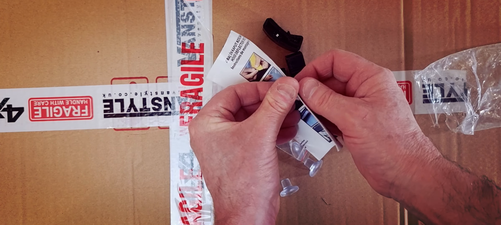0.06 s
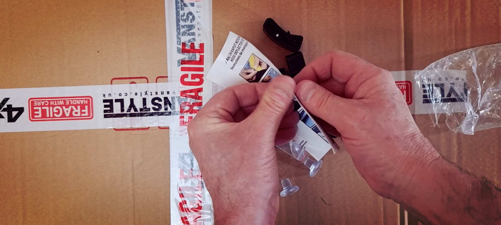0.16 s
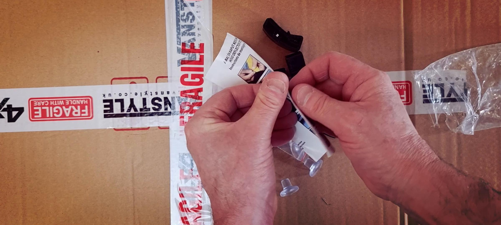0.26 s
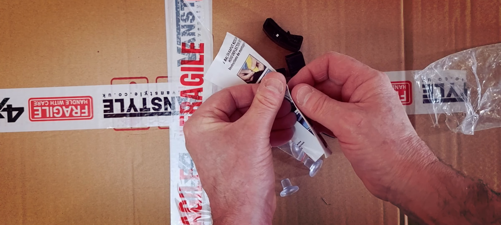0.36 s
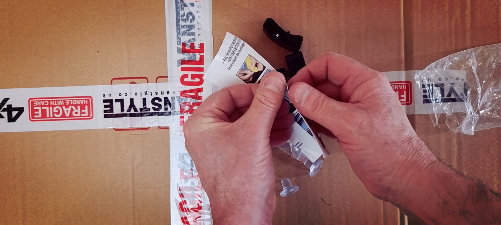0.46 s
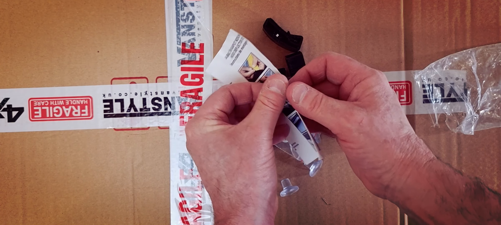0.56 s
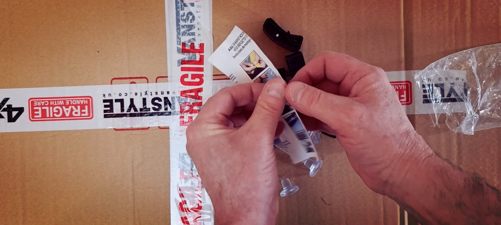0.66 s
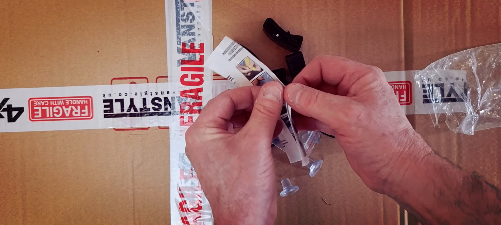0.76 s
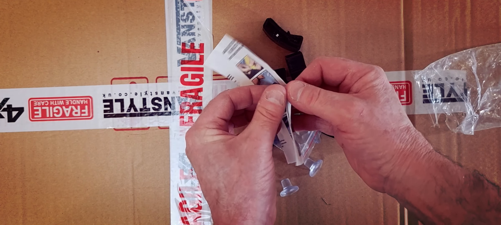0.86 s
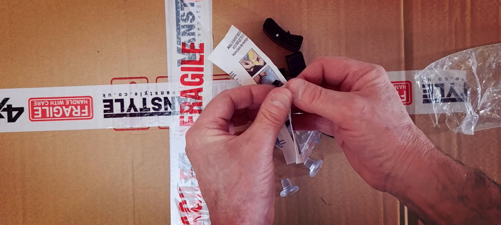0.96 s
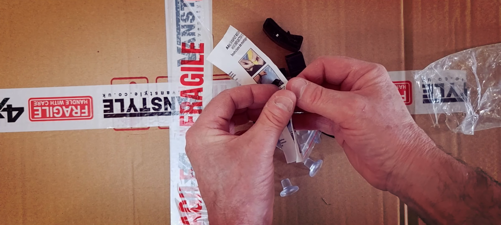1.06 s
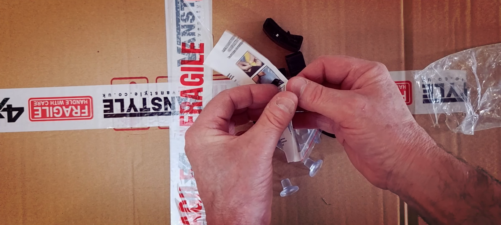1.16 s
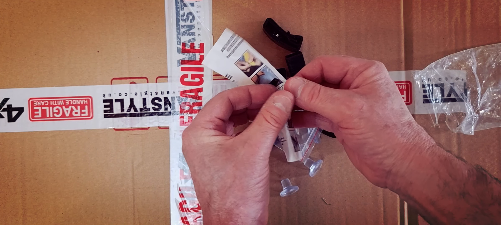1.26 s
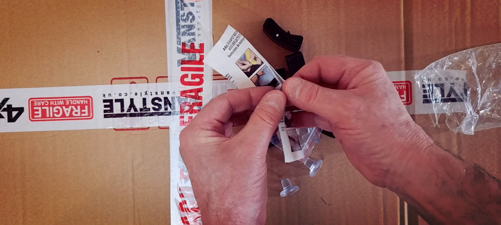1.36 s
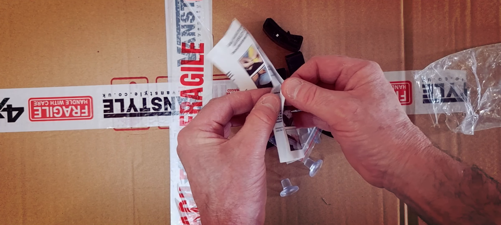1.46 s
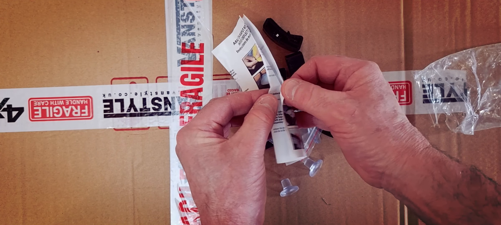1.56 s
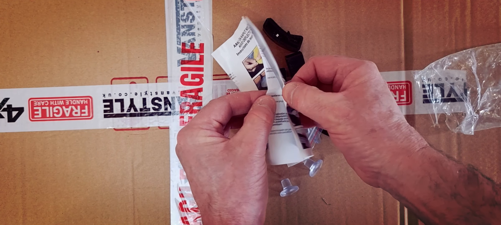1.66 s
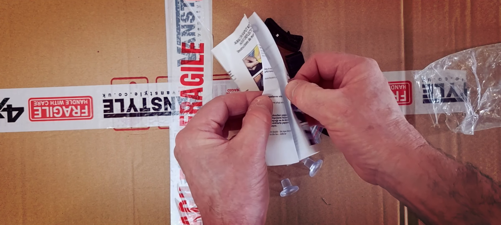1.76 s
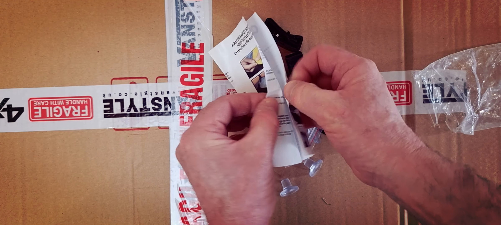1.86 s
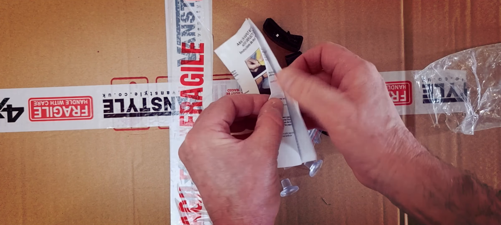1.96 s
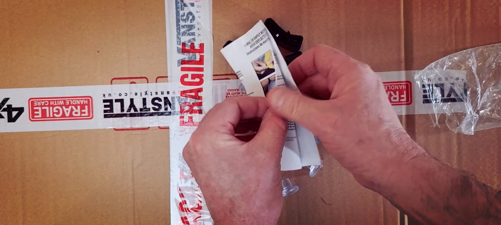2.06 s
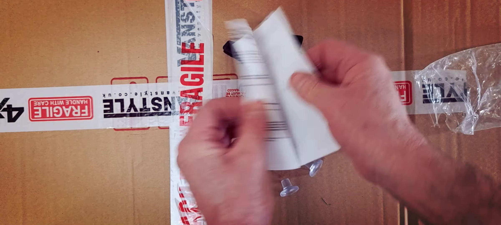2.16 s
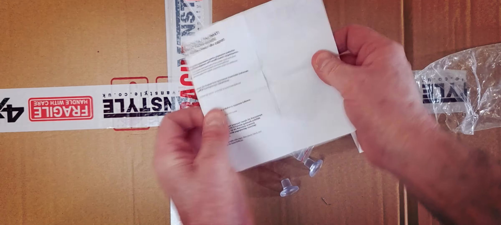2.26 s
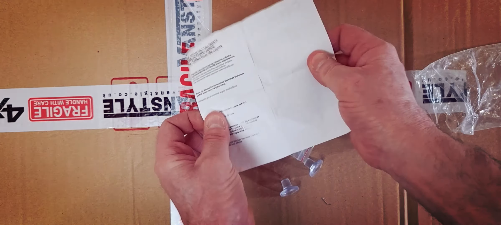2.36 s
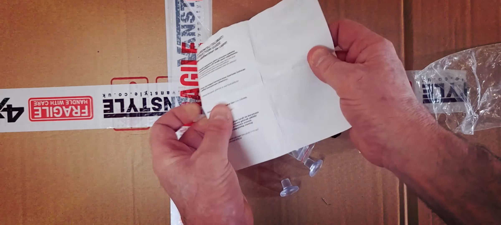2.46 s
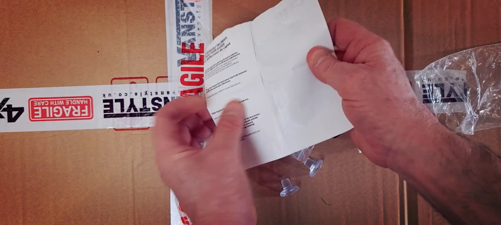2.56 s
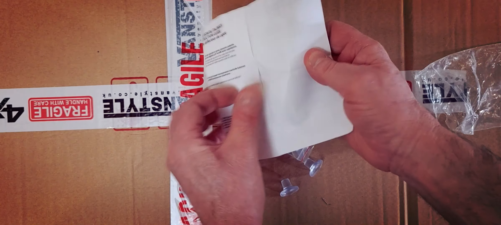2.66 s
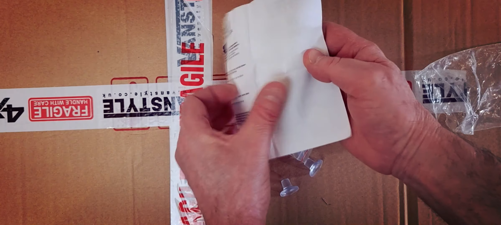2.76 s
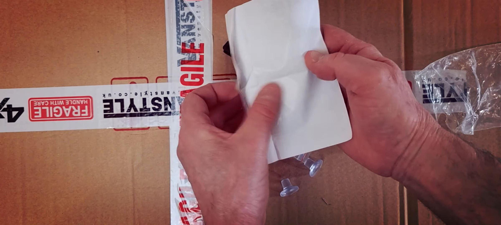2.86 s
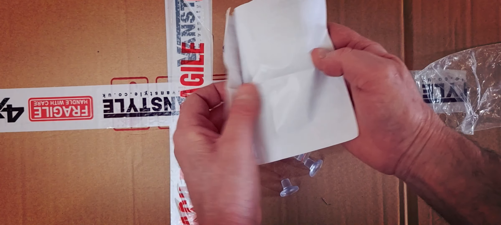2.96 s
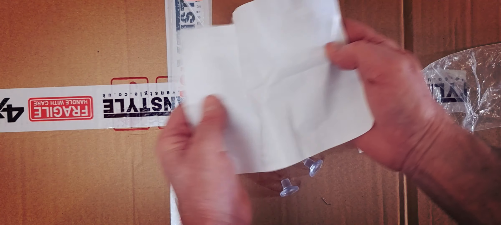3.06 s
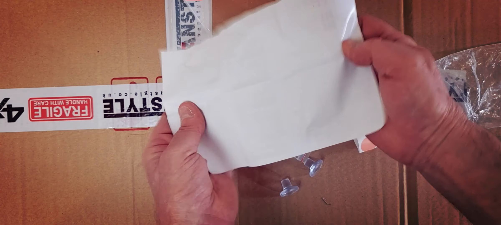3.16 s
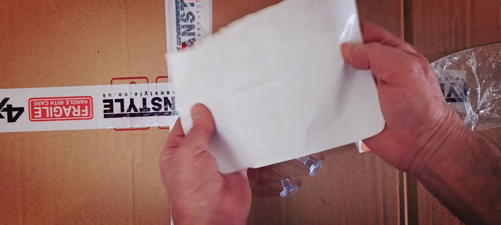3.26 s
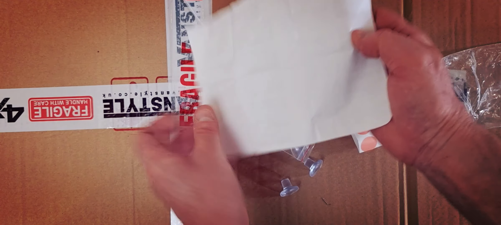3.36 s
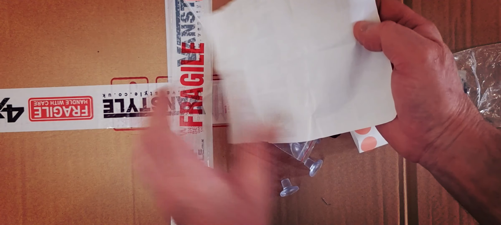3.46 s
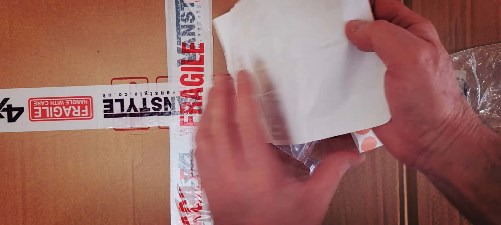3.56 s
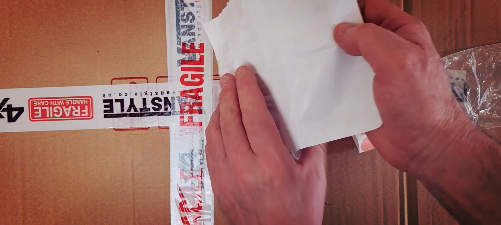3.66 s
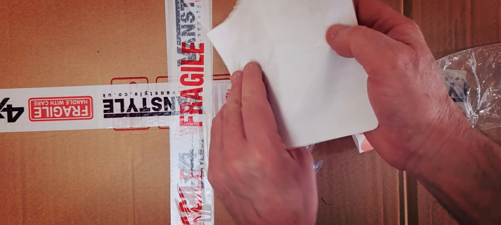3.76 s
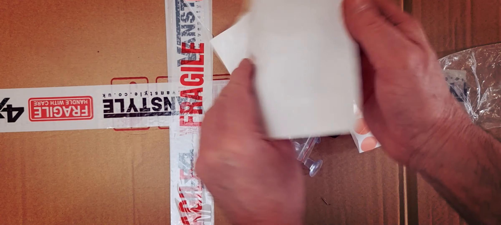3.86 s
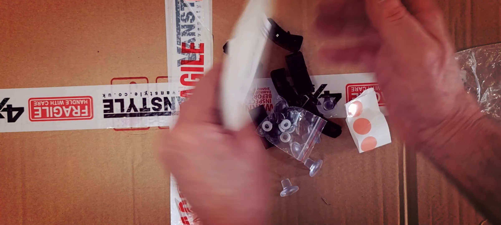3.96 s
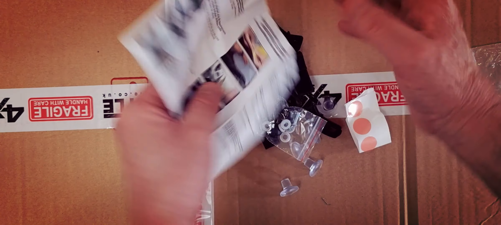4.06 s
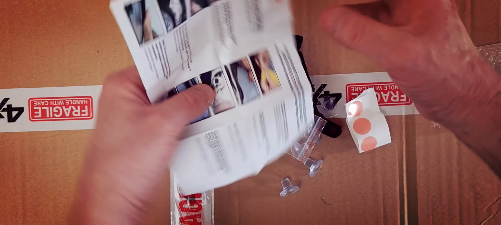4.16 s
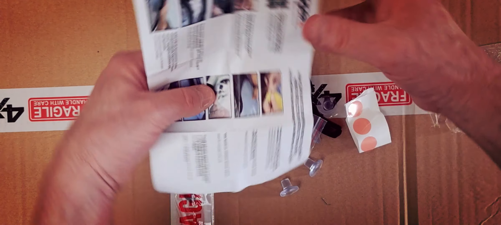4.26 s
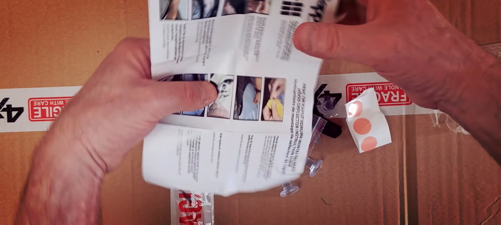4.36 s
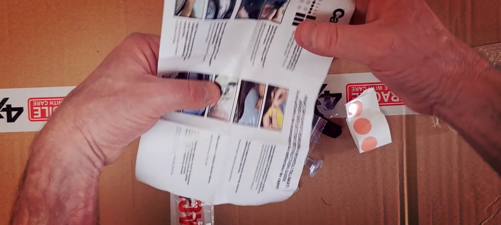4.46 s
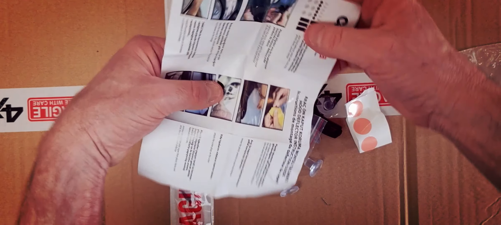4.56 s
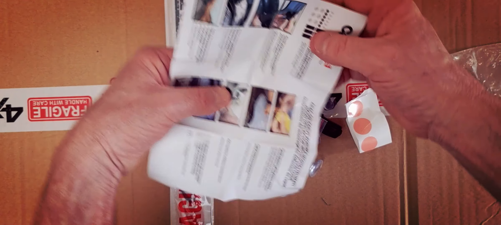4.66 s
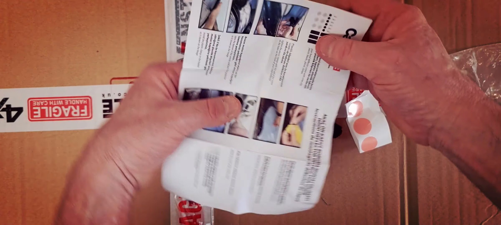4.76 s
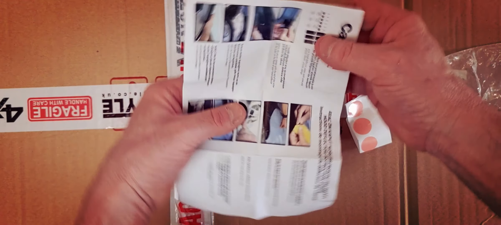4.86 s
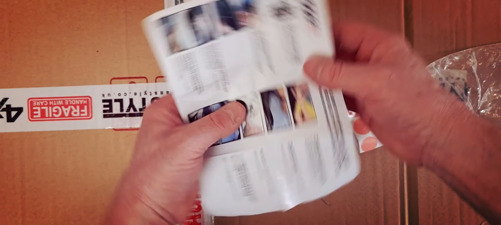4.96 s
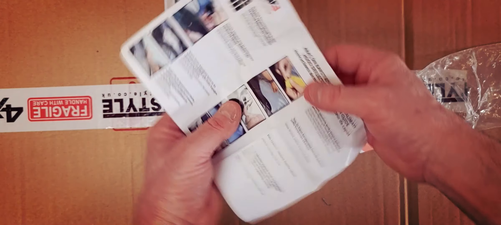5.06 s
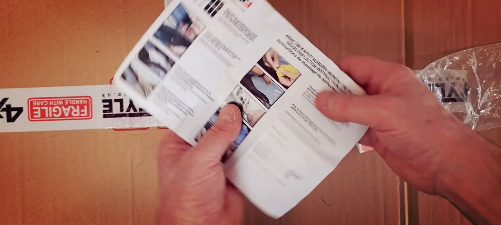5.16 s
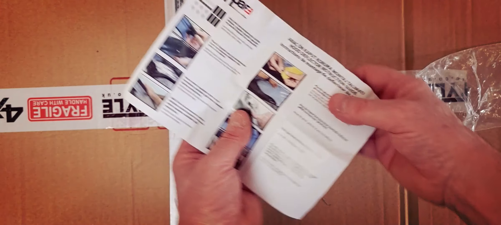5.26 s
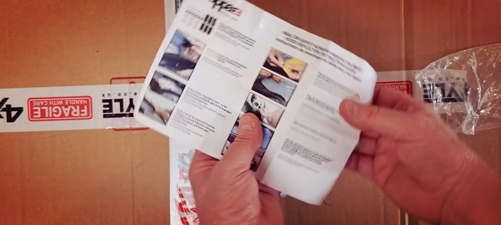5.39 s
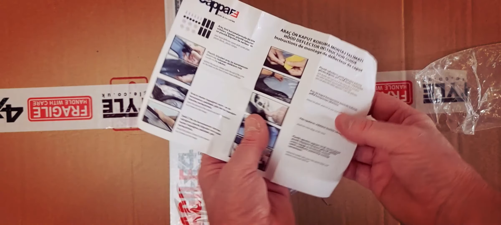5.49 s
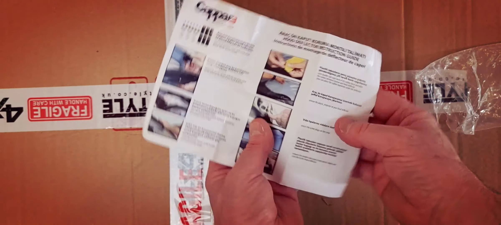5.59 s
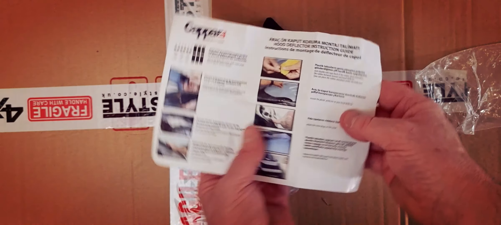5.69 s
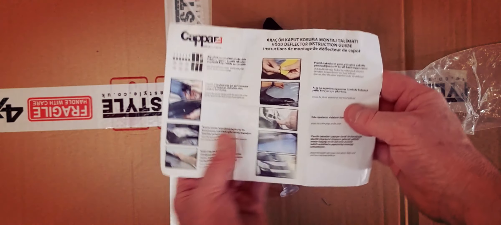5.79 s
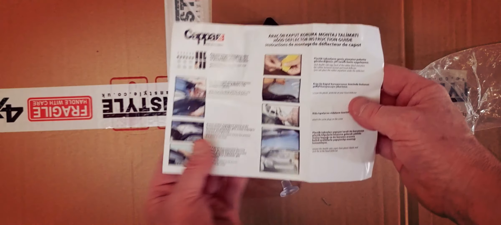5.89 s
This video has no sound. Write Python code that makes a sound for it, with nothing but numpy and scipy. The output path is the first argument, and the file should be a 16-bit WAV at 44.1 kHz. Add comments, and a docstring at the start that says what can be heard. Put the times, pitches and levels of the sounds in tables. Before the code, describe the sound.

Hands unfold and flip a sheet of paper close to the microphones, with irregular crinkles, soft rubbing and sharp crease snaps in a quiet room.

```python
"""Creases snap as two hands unfold a sheet of paper just under a pair of microphones in a quiet room.
Each snap is a short noise burst sent through the sheet's resonances. Rubbing fingers and quick
scrunches send noise and tiny grains through the same sheet; wide flips make low puffs of air.
A faint whistle rises and falls once. Near surfaces return a short tail over steady room noise."""
import sys
import numpy as np
from scipy import signal
from scipy.fft import rfft, irfft
from scipy.io import wavfile
from scipy.ndimage import uniform_filter1d

SR = 44100
rng = np.random.default_rng(int(sys.argv[2]) if len(sys.argv) > 2 else 0)


def log_audio(samples):
    """Write samples as a 16-bit WAV file to the path given in sys.argv[1]."""
    # one column per channel
    frames = np.atleast_2d(samples).T
    # limit to full scale, then quantise
    limited = np.clip(frames, -1, 1)
    pcm = np.round(limited * 32767).astype(np.int16)
    wavfile.write(sys.argv[1], SR, pcm)


N = 261273  # length in samples

# Creases that buckle, before the microphone gains: t/s, crack peak level/dB, crack f/Hz,
# thud level against crack/dB, tick level against crack/dB, duration/ms
CREASE_SNAPS = [(0.732, -41.5, 4900, -38, -27, 1.5), (0.871, -63.5, 4600, -20, 10, 1.8),
                (1.2399, -43, 4320, -20, 16.5, 1.7), (1.3707, -55.5, 4300, -8, 7.5, 3),
                (1.4823, -49, 2630, -9.5, 7.5, 1.3), (1.5083, -52.5, 1530, -7, 10, 6.3),
                (1.5864, -50.5, 4220, -8, 3.5, 8.5), (1.6217, -54, 4100, -7, 7, 2.4),
                (1.703, -7, 2820, -28, -70, 0.74), (1.888, -30.5, 3740, -17, 1.5, 2.4),
                (1.927, -25.5, 1950, -9, -5, 2.3), (2.039, -38.5, 3020, -20, -22, 1.9),
                (2.0865, -30.5, 2830, -7, -9, 4.5), (2.125, -37, 1370, 2, 1.5, 2.8),
                (2.1318, -18, 2800, -2.5, -7, 1.94), (2.1841, -16.5, 3450, -4, -41, 1.2),
                (2.2642, -22, 2320, -1, -35, 2.8), (2.2815, -37.5, 1400, 11.5, 6, 2.4),
                (2.4633, -53.5, 1400, 12.5, -32, 2.3), (2.617, -27, 2300, -5.5, -27, 4.1),
                (2.6403, -26, 1580, -5, -9, 0.82), (2.6588, -52, 1410, 22.5, -27, 3.2),
                (2.7066, -34.5, 2240, -2.5, -7.5, 3.7), (2.721, -39, 2050, -12, -2.5, 2.4),
                (2.7644, -41, 1720, -19, -5, 2.7), (2.7963, -30.5, 1920, -3.5, -16, 1.7),
                (2.8194, -12, 2030, -12.5, -19, 2.07), (2.8465, -32, 1710, 6, -19, 0.7),
                (2.8536, -33.5, 1990, -9, -2.5, 3.9), (2.8797, -16.5, 1930, -6, -14, 2.2),
                (2.9067, -42.5, 1900, 12, -14, 1.1), (2.9677, -26, 3200, -11.5, -12, 4.3),
                (2.9964, -32, 1640, -3, -8, 12), (3.016, -17.5, 2540, -16, -23, 2.8),
                (3.03, -16, 1960, -8.5, -10, 1.7), (3.041, -38.5, 2160, -2, 12, 2.3),
                (3.1085, -23, 1770, 1.5, -37, 2), (3.124, -30, 1480, 8, -26, 2.1),
                (3.1386, -17, 3050, -1, -1, 1.7), (3.141, -16, 2470, 11, -22, 1.8),
                (3.1441, -3, 2324, -5, -8, 2.1), (3.2484, -26.5, 2400, -11, -13, 0.67),
                (3.2855, -36, 2260, -2.5, 1, 1.24), (3.3346, -19, 3380, -18.5, -4.5, 2.9),
                (3.523, -59, 3310, 2.5, -13.5, 1.5), (3.5806, -44, 3650, -21, 6, 2.1),
                (3.6945, -52, 1497, -10, -14.5, 2.8), (3.7506, -32.5, 1900, -7, -4, 2.8),
                (3.796, -15.5, 1970, -6, -39, 1.85), (3.8055, -19, 2960, -10, -39, 1.2),
                (3.8289, -18.5, 2160, -7.5, -23, 1.8), (3.8633, -30, 2080, -4.5, -12, 2.2),
                (3.896, -29, 1500, -1.5, -34, 3.2), (3.9096, -28.5, 3170, -2, -38.5, 1.15),
                (3.9628, -30, 3750, -19.5, -3.5, 1.16), (3.997, -43, 3500, -14, 5, 1.9),
                (4.2926, -44, 2850, -22, -9.5, 4), (4.3967, -47.5, 1330, 2, -18, 3.1),
                (4.4151, -46, 1420, 0.5, -3, 5.4), (4.4352, -38, 1450, -5, 3, 5),
                (4.4808, -29, 3360, -28, -2.5, 0.95), (4.563, -37, 3100, -11.5, -5.5, 8.3),
                (4.5866, -28.5, 3170, -15, -2.5, 1.5), (4.6828, -28, 2050, -2, -15, 5.7),
                (4.7579, -40.5, 1800, 1, 0, 3.7), (4.8422, -36.5, 1700, -10, -13, 0.89),
                (4.8976, -28.5, 2840, -2.5, -11, 2.54), (4.9584, -38, 3100, -9.5, -20, 6.5),
                (5.024, -45.5, 1920, -1, -1, 8.7), (5.0869, -39.5, 2150, 4, 2.5, 5.3),
                (5.1027, -29.5, 1680, -1.5, -31, 3.2), (5.1247, -28.5, 3240, -3.5, -6.5, 5.2),
                (5.1391, -37.5, 3460, 2, -4, 1.3), (5.345, -26, 3700, -4.5, -6, 2.9),
                (5.3865, -41, 4500, 10.5, 0.5, 3.7), (5.4302, -60.5, 2320, 17.5, -25, 1.7),
                (5.513, -48.5, 2400, 2.5, 2.5, 12), (5.558, -42, 2190, 6.5, -3.5, 3.6),
                (5.5973, -51, 3150, 13.5, -26, 4.4), (5.639, -45, 2200, -1, 0, 0.7),
                (5.656, -17.5, 2100, -4, -8.5, 1.53), (5.8098, -40.5, 3210, -6, -32, 0.47)]
# Resonances of the sheet, low to high (panel, body, crackle, fizz, air): f/Hz, basic width/Hz
SHEET_RINGS = [(300, 214), (900, 953), (2700, 3700), (6800, 4810), (12000, 9500)]
# Free area of sheet between the fingers: t/s, panel level against body/dB, common thud f/Hz
FREE_SHEET = [(0, 3.5, 800), (1.3, -7, 1130), (2.1, -18.5, 1020), (2.3, -6.5, 1050), (2.62, -8, 1040),
              (2.75, -4.5, 714), (2.9, -9, 720), (3.0, -6.5, 1020), (3.1, -6.5, 800), (3.15, -1.5, 920),
              (3.4, -3.5, 830), (3.8, -3.5, 800), (3.95, -8, 760), (4.4, 1, 600), (4.7, -16.5, 834),
              (5.1, -5.5, 813), (5.5, -13.5, 860), (5.9, -19, 813)]
# Fingers rubbing the sheet: t/s, level/dB, treble level against body/dB
FINGER_RUBBING = [(0.0, -64, 0.5), (0.3, -66.5, 4), (0.67, -65.5, 3), (0.99, -74.5, 2), (1.27, -86.5, -18),
                  (1.47, -66, 18), (1.71, -82.5, -14), (2.04, -59, -7.5), (2.42, -55, -11.5),
                  (2.47, -71.5, 3), (2.75, -58, -7), (3.2, -44.5, -7), (3.36, -70, -1), (3.55, -89.5, -3),
                  (3.72, -70, -7), (3.89, -76.5, 22), (4.1, -59, -4), (4.299, -86, -36), (4.42, -54.5, 2),
                  (5.01, -71, 16), (5.498, -70, 4.5), (5.92, -57, -7.5)]
# Quick scrunches, swells of dense crinkles: centre t/s, length/ms, crackle f/Hz,
# body level/dB, crackle level/dB, fizz level/dB
QUICK_SCRUNCHES = [(.01, 37, 2880, -56.5, -48, -50), (0.356, 174, 3100, -68, -55, -68),
                   (1.499, 32, 3620, -72, -60, -57), (1.738, 166, 2300, -85, -49, -63.5),
                   (1.863, 110, 2980, -72, -54, -61.5), (1.925, 77, 3200, -54.5, -39, -45),
                   (2.11, 91, 3000, -74, -47, -55), (2.279, 13, 3670, -38, -37.5, -61),
                   (2.392, 190, 3100, -56, -65.5, -63), (2.648, 53, 2190, -42.5, -47, -86),
                   (2.83, 230, 2250, -62, -52, -59), (3.031, 45, 2480, -32.5, -46, -47),
                   (3.22, 260, 2420, -59.5, -52.5, -74), (3.328, 154, 3480, -54.5, -49.5, -54.5),
                   (3.81, 160, 2530, -53, -54, -58), (3.886, 81, 3230, -46, -39.5, -47.5),
                   (3.989, 190, 3600, -72, -61, -61.5), (4.24, 290, 2430, -64.5, -61.5, -89),
                   (4.423, 39, 2150, -53, -54, -56), (4.596, 68, 3220, -59, -47, -59.5),
                   (4.781, 190, 1920, -66.5, -66, -57), (4.911, 120, 3250, -53, -53.5, -57),
                   (5.062, 62, 1990, -66, -52.5, -62), (5.136, 320, 3330, -54.5, -47.5, -55.5),
                   (5.351, 71, 3840, -47.5, -45, -52), (5.539, 110, 2200, -57.5, -58.5, -64),
                   (5.626, 56, 3180, -58, -51, -66), (5.77, 40, 2580, -70, -66.5, -77),
                   (5.901, 59, 2800, -58, -52.5, -71)]
# Amount of smooth rub against crinkle, one factor for each ring of the sheet
RUB_AMOUNTS = [10, 2.9, .9, 2.8, 1.3]
# Puffs of air from wide flips: t/s, level before the rise and fade/dB, f/Hz
AIR_PUFFS = [(2.275, -38.5, 105.5), (2.441, -67, 149), (3.018, -60.5, 78.6), (3.142, -34.5, 90.8),
             (3.821, -59, 118), (3.915, -55, 116), (4.777, -65, 153), (5.065, -63.5, 88.8),
             (5.36, -63, 53.6)]
# How fast the echoes die: f/Hz, time to fall by 60 dB/s
ECHO_FADE = [(200, 0.053), (600, 0.2), (1500, 0.12), (4000, 0.14), (10000, 0.07)]
# Left-right likeness of the echoes: f/Hz, likeness (0 to 1)
ECHO_LIKENESS = [(300, 0.25), (900, 0.18), (2500, 0.62)]
# Two strong early returns: delay/s, level against the whole tail/dB
EARLY_ECHOES = [(0.0097, -11), (0.018, -11.5)]
# Colour of the room noise: f/Hz, relative level/dB
NOISE_COLOUR = [(15, -39.5), (25, -15.5), (58, -6.5), (170, -30.5), (344, -7), (641, -27.5), (695, -20),
                (863, -36), (1700, -22.5), (2610, -27.5), (3720, -24.5), (4490, -32), (10100, -38.5),
                (16000, -45.5)]
# Left-right likeness of the room noise: f/Hz, likeness (-1 to 1)
NOISE_LIKENESS = [(60, 0.39), (240, -0.09), (950, -0.33), (3770, 1), (15000, 0.04)]

LEAD_S = 7 / SR  # the sheet is nearer the left microphone
CRACK_SPREAD = 1.15  # width of the crack ring over its pitch
THUD_SPREAD = .1  # each crease thuds a little off the common pitch
AIR_DB = -12  # the air ring against the fizz ring below it
CRINKLES_PER_S, CRINKLE_SHARE = 160, 0.58  # small separate crinkles, and their share of the rustle
RUB_SIDES_DB = -5  # body and fizz rings against the crackle
CALM_DB, BUSY_DB = -70, -57  # between these levels, handling grows clumpier and more crinkly
PUFF_RISE_S, PUFF_FADE_S = .0028, .0061
WHISTLE_S = (4.16, 4.305)  # start and end
WHISTLE_HZ, WHISTLE_ARCH_HZ, WHISTLE_DB = 10400, 480, -88
ECHO_DB = -11.5  # echoes against the direct sound
NOISE_DB = -69  # overall level of the room noise
EDGE_HZ = 16000  # upper limit of the sound


def gain_of(db):
    """Turns decibels into gain."""
    return 10 ** (np.asarray(db) / 20)


def evened(x):
    """Scales a signal to rms 1."""
    return x / np.sqrt(np.mean(x ** 2) + 1e-20)


def read(points, hz):
    """Reads a (f/Hz, value) table between its points on a log frequency axis."""
    f, value = np.transpose(points)
    return np.interp(np.log(hz + 1), np.log(f + 1), value)


def add(mix, s, sound):
    """Mixes a sound in at time s."""
    part = mix[round(s * SR):][:len(sound)]
    part += sound[:len(part)]


def ring(x, hz, width_hz):
    """A damped resonance passed twice, so it falls off steeply on both sides."""
    b, a = signal.iirpeak(hz, hz / width_hz, SR)
    once = signal.lfilter(b, a, x)
    return signal.lfilter(b, a, once)


def snaps():
    """Each crease buckles in a brief swell of noise, which rings the sheet as thud, crack and tick."""
    out = np.zeros((2, N))
    t_ms = np.arange(1024) * 1000 / SR
    free_s, free_db, free_hz = np.transpose(FREE_SHEET)
    (panel_hz, panel_width), (_, body_width), _, fizz, air = SHEET_RINGS
    jolts = rng.standard_normal((len(CREASE_SNAPS), 1027))
    for (s, db, hz, body_db, tick_db, ms), jolt in zip(CREASE_SNAPS, jolts):
        side_wobble, lead_wobble, thud_wobble = jolt[:3]
        swell = t_ms ** 0.56 * np.exp(-(t_ms / max(ms, .2)) ** 1.3)
        z = rfft(jolt[3:] * swell)
        # the jolt is made even in colour; the sheet colours it
        burst = irfft(z / uniform_filter1d(abs(z), size=24), 1024) * (t_ms < 14)

        thud_hz = np.interp(s, free_s, free_hz) * np.exp(THUD_SPREAD * thud_wobble)
        panel = ring(burst, panel_hz, 1.51 * panel_width)
        thud = ring(burst, thud_hz, 0.48 * body_width)
        crack = ring(burst, hz, CRACK_SPREAD * hz)
        crack = ring(crack, hz, CRACK_SPREAD * hz)
        parts = [panel, thud, crack, ring(burst, *fizz), ring(burst, *air)]
        panel_db = body_db + np.interp(s, free_s, free_db)
        levels_db = (panel_db, body_db, 0, tick_db, tick_db + AIR_DB)
        sound = sum(gain_of(db + rel_db) * part / abs(part).max()
                    for part, rel_db in zip(parts, levels_db))

        # a varying left level and delay give each snap its own spot
        add(out[0], s, sound * gain_of(.9 * side_wobble))
        add(out[1], s + LEAD_S * (1 + .22 * lead_wobble), sound)
    return out


def rustle(per_s=1500, spread_db=4.3, patchy_db=4.0):
    """Clumped tiny buckles over the steady rub of skin, heard through each ring of the sheet."""
    t = np.arange(N) / SR
    s, level_db, tilt_db = np.transpose(FINGER_RUBBING)
    level_db, tilt_db = np.interp(t, s, level_db), np.interp(t, s, tilt_db)
    body = gain_of(level_db + RUB_SIDES_DB - tilt_db / 2)
    crackle = gain_of(level_db)
    fizz = gain_of(level_db + RUB_SIDES_DB + tilt_db / 2)
    free_s, free_db, _ = np.transpose(FREE_SHEET)
    panel = body * gain_of(np.interp(t, free_s, free_db) + 2.0)

    # scrunches swell and fade over the rubbing
    swells = [np.cos(np.clip((t - centre) * 1000 / ms, -.5, .5) * np.pi) ** 2
              for centre, ms, *_ in QUICK_SCRUNCHES]
    _, _, crackle_hz, *scrunch_db = np.transpose(QUICK_SCRUNCHES)
    body_peak, crackle_peak, fizz_peak = gain_of(scrunch_db)
    body = body + body_peak @ swells
    fizz = fizz + fizz_peak @ swells

    busy = np.interp(20 * np.log10(body + fizz), (CALM_DB, BUSY_DB), (.3, 1))
    slow_noise = evened(uniform_filter1d(rng.standard_normal(N), 900))
    clumps = gain_of(2.86 * busy * slow_noise)

    # tiny buckles strike at random moments, with a few much stronger than the rest
    chance = rng.random(N)
    size = gain_of(spread_db * np.minimum(rng.exponential(1, N), 3.5))
    buckles = size * (chance < per_s / SR)
    crinkles = size * (1 - chance < CRINKLES_PER_S / SR)
    grains = evened(signal.lfilter([1], [1, -.96], buckles))  # each lasts about a millisecond
    grains += CRINKLE_SHARE * evened(signal.lfilter([1], [1, -.9], crinkles))  # shorter still

    # panels change size under the fingers, so colours drift
    z = signal.stft(rng.standard_normal((2, N)), nperseg=512)[2]
    patches = uniform_filter1d(rng.standard_normal(z.shape), 3, 1)  # smoothed over frequency
    patches = uniform_filter1d(patches, 12, 2)  # smoothed over time
    drifting = z * gain_of(patchy_db * evened(patches))
    skin, fibres = signal.istft(drifting, nperseg=512)[1][:, :N]

    drives = [clumps * (rub * skin + busy * grains * fibres) for rub in RUB_AMOUNTS]
    out = sum(peak * swell * evened(ring(drives[2], hz, 890))
              for hz, peak, swell in zip(crackle_hz, crackle_peak, swells))
    gains = (panel, body, crackle, fizz, fizz * gain_of(AIR_DB))
    for (hz, width_hz), gain, drive in zip(SHEET_RINGS, gains, drives):
        out += gain * evened(ring(drive, hz, 0.94 * width_hz))
    return out


def puffs():
    """A flip moves air: a low swing of pressure that rises and dies within milliseconds."""
    out = np.zeros(N)
    t = np.arange(6000) / SR
    envelope = t / PUFF_RISE_S * np.exp(1 - t / PUFF_FADE_S)
    for s, db, hz in AIR_PUFFS:
        add(out, s, gain_of(db) * np.sin(2 * np.pi * hz * t) * envelope)
    return out


def whistle():
    """A thin, faint tone whose pitch arches up and down."""
    out = np.zeros(N)
    start, end = WHISTLE_S
    u = np.linspace(0, 1, round((end - start) * SR))
    hz = WHISTLE_HZ + WHISTLE_ARCH_HZ * np.sin(np.pi * u)
    tone = np.sin(2 * np.pi * np.cumsum(hz) / SR)
    fades = signal.windows.tukey(len(u), .3)
    add(out, start, np.sqrt(2) * gain_of(WHISTLE_DB) * fades * tone)
    return out


def room(x, first=90, size=16000):
    """Sparse echoes of random sign build up over about 9 ms; each band dies at its own speed."""
    taps = np.zeros((2, size))
    starts = np.arange(first, size - 20, 20)
    at = starts + rng.integers(0, 20, (2, len(starts)))
    signs = rng.choice([-1., 1.], at.shape)
    np.put_along_axis(taps, at, signs * np.clip(at / 400, 0, 1), 1)

    hz, t, z = signal.stft(taps, SR, nperseg=128)
    same = np.clip(read(ECHO_LIKENESS, hz), 0, 1)[:, None]  # how alike the two sides are
    z = np.array([z[0], same * z[0] + np.sqrt(1 - same ** 2) * z[1]])
    fade = gain_of(-60 * t / read(ECHO_FADE, hz)[:, None])
    tail = signal.istft(z * fade, SR, nperseg=128)[1]
    tail /= np.linalg.norm(tail[0])
    for delay_s, db in EARLY_ECHOES:
        # each side hears the return at a slightly different moment
        tail[[0, 1], round(delay_s * SR) + rng.integers(0, 12, 2)] += gain_of(db)
    return signal.fftconvolve(x[None], tail, axes=1)[:, :N]


def room_noise():
    """Steady coloured noise of the room, partly shared by the microphones."""
    hz = np.fft.rfftfreq(N, 1 / SR)
    left, other = rfft(rng.standard_normal((2, N)))
    same = np.clip(read(NOISE_LIKENESS, hz), -1, 1)
    right = same * left + np.sqrt(1 - same ** 2) * other
    z = np.array([left, right]) * gain_of(read(NOISE_COLOUR, hz))
    return gain_of(NOISE_DB) * evened(irfft(z, N))


def scene():
    """The sheet reaches the left microphone a little earlier and louder; echoes, puffs and noise join."""
    rubbing = rustle() + whistle()
    rubbing_right = np.roll(rubbing, round(LEAD_S * SR))
    paper = snaps() + np.array([rubbing, rubbing_right])
    direct = paper * gain_of([[2.5], [.2]])  # left and right gain in dB
    echoes = gain_of(ECHO_DB) * room(paper[1])
    air = puffs() * gain_of([[.6], [-.6]])
    return direct + echoes + air + room_noise()


def record(dry):
    """Clips at full scale, then removes the highest treble."""
    edge = signal.firwin(511, EDGE_HZ, window=("kaiser", 9), fs=SR)
    return signal.oaconvolve(np.clip(dry, -1, 1), edge[None], "same")


dry = scene()
out = record(dry)
log_audio(out)
```